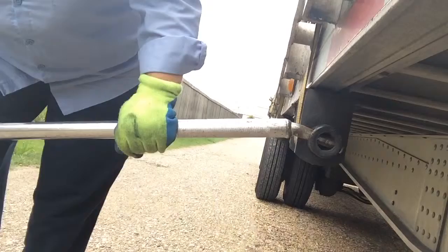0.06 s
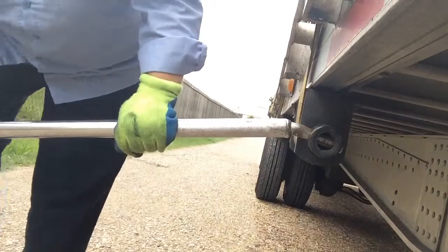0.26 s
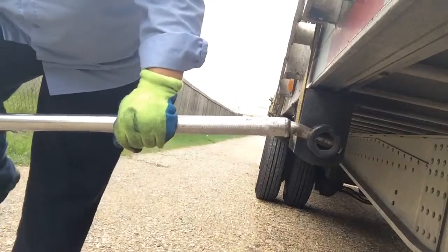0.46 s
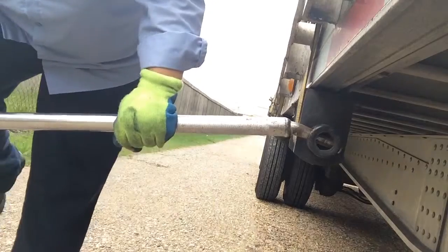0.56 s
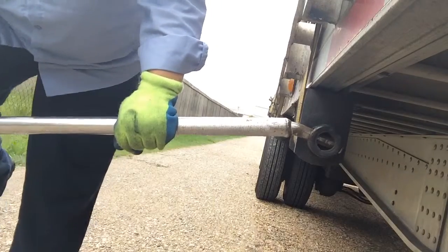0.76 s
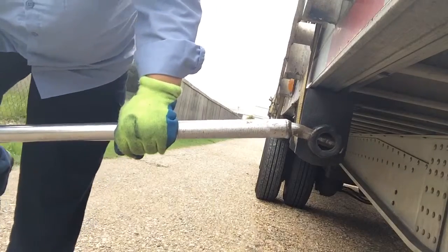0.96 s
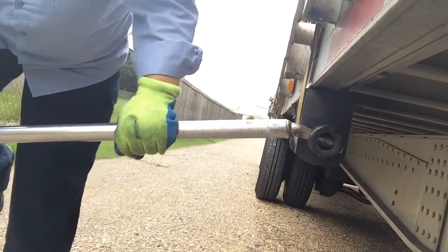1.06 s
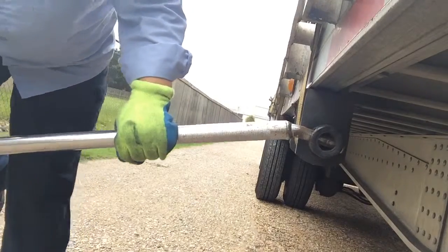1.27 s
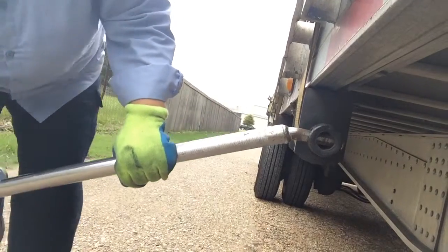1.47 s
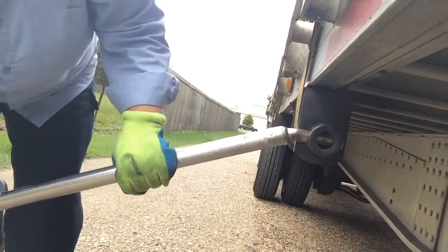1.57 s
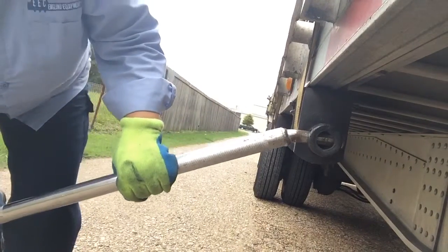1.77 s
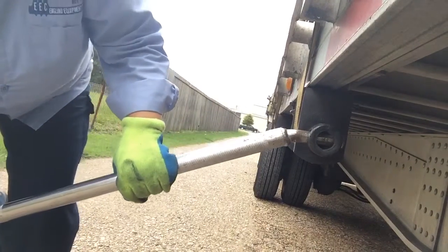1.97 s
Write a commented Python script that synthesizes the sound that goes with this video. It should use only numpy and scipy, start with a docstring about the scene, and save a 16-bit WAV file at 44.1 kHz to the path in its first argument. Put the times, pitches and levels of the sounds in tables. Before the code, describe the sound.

A steel bar works a trailer strap winch with a loud, ratcheting metallic clank over low rumble

```python
"""First comes an uneven low rumble, probably a diesel: lumpy coloured noise with soft low thumps and a drone.
Behind it the hiss of distant traffic, noise that drifts in brightness, swells and fades.
Then a steel bar swings a strap winch on a flatbed trailer: the pawl drops over a few ratchet teeth in one
quick clank. Each blow is a burst of chatter that leaves noise bands and decaying sines ringing in the frame.
The bar rattles in its socket, then starts to scrape: grainy coloured noise."""
import sys
import numpy as np
from scipy import signal
from scipy.fft import rfft, irfft
from scipy.io import wavfile
from scipy.ndimage import uniform_filter1d, minimum_filter1d

SR = 44100
rng = np.random.default_rng(int(sys.argv[2]) if len(sys.argv) > 2 else 0)


def to_wav(sig):
    """Store sig (one row per channel, or 1-D mono) as 16-bit WAV at the path in sys.argv[1].

    Samples outside -1..1 are clipped; the rate is SR.
    """
    pcm = np.clip(np.atleast_2d(sig), -1, 1) * 32767
    pcm = np.round(pcm).astype(np.int16)
    wavfile.write(sys.argv[1], SR, pcm.T)  # frames by channels


N = 88200  # samples, two seconds
TILT_HZ = 1000  # pivot of every treble tilt


def amp(db):
    """Turns decibels into a gain."""
    return 10 ** (np.asarray(db) / 20)


def unit(x):
    """Scales to rms 1."""
    return x / np.sqrt(np.mean(x ** 2) + 1e-20)


def read(points, hz):
    """Reads a table on a log-frequency axis."""
    f, value = np.transpose(points)
    return np.interp(np.log(hz + 1), np.log(f + 1), value)


def curve(points):
    """Reads a table along the time of the scene."""
    return np.interp(np.arange(N) / SR, *np.transpose(points))


def add(mix, start_s, sound):
    """Mixes a sound in at its start time, cut off at the end of the scene."""
    part = mix[round(start_s * SR):][:len(sound)]
    part += sound[:len(part)]


def colour(x, points):
    """Filters x by a spectrum table, then scales it to rms 1."""
    hz = np.fft.rfftfreq(len(x), 1 / SR)
    return unit(irfft(rfft(x) * amp(read(points, hz)), len(x)))


def octaves(hz):
    """Octaves above the pivot of a tilt; everything below 200 Hz counts as 200 Hz."""
    return np.log2(np.maximum(hz, 200) / TILT_HZ)


def bursts(size, per_s, fall_s, depth):
    """A gain that swells quickly at random contacts and falls back, at rms 1."""
    hits = 1. * (rng.random(size) < per_s / SR)
    t = np.arange(size) / (fall_s * SR)
    swell = 2 * t * np.exp(1 - 2 * t)
    return unit(1 + depth * signal.fftconvolve(hits, swell)[:size])


def ripple(x, gap_hz, depth_db):
    """Random peaks and dips, at full depth above 1500 Hz, as a gain for each bin of x."""
    hz = np.fft.rfftfreq(len(x), 1 / SR)
    heights = np.clip(rng.standard_normal(4096), -2, 2)
    peaks = np.interp(hz / gap_hz, np.arange(4096), heights)
    return amp(depth_db * np.clip(hz / 1500, 0, 1) * peaks)


# Colour of the traffic hiss [pitch_hz, relative level_db per Hz]
TRAFFIC_COLOUR = [(290, -26), (500, -4.5), (578, -7), (629, -5), (938, -0.5), (1280, -6), (1600, -5.5),
                  (1940, -11.5), (2960, -15.5), (3220, -13.5), (3910, -19.5), (7690, -27), (9000, -35.5),
                  (11700, -63), (19800, -120)]
# Colour of the faint fizz that follows the traffic [pitch_hz, relative level_db per Hz]
FIZZ_COLOUR = [(6000, -22), (9000, -6), (10200, 5), (11300, -10), (12500, -14), (13200, 6), (13800, -15),
               (15000, -22)]
# Drift in brightness [time_s, tilt_db per octave]
TRAFFIC_TILT = [(0, -0.5), (.25, -1.5), (.65, -0.5), (1.3, 0), (2, -2.5)]
# Swell and fade [time_s, gain_db]
TRAFFIC_LEVEL = [(0, -49.5), (.08, -54), (.22, -45.5), (.6, -43.5), (.95, -45), (1.3, -47), (1.8, -54.5),
                 (2, -49)]
FIZZ_DB = -23.5  # against the main hiss


def traffic():
    """Distant tyre hiss is broadband noise whose treble tilt and level drift with time."""
    hiss = colour(rng.standard_normal(N), TRAFFIC_COLOUR)
    fizz = amp(FIZZ_DB) * colour(rng.standard_normal(N), FIZZ_COLOUR)
    hz, t, bands = signal.stft(hiss + fizz, SR, nperseg=512)
    bands = bands * amp(octaves(hz)[:, None] * np.interp(t, *np.transpose(TRAFFIC_TILT)))
    return signal.istft(bands, SR)[1][:N] * amp(curve(TRAFFIC_LEVEL))


# Colour of the rumble [pitch_hz, relative level_db per Hz]
RUMBLE_COLOUR = [(12, -52), (20, -31), (43, -16.5), (59, -9), (81, -2.5), (124, -5), (216, -18), (247, -13),
                 (274, -32.5), (300, -30), (390, -33), (660, -120)]
# Its level [time_s, level_db]
RUMBLE_LEVEL = [(0, -27.5), (.08, -39.5), (.14, -32), (.3, -32), (.5, -33), (.7, -33.5), (.92, -37),
                (1.05, -35.5), (1.22, -38.5), (1.33, -34), (1.6, -35.5), (1.82, -39.5), (2, -35)]
# Colour of the low drone above the rumble [pitch_hz, relative level_db per Hz]
DRONE_COLOUR = [(120, -23), (190, -1.5), (250, -3.5), (320, 0.5), (450, -9.5), (900, -26), (3000, -49.5)]
# Its level [time_s, level_db]
DRONE_LEVEL = [(0, -35), (.05, -33.5), (.075, -45), (.15, -38), (.35, -43.5), (.8, -44.5), (1.25, -48),
               (1.8, -42.5), (2, -40)]
# Heaviest thumps in the rumble [centre_s, peak level_db]
THUMPS = [(0.247, -29), (.354, -21.5), (0.377, -30.5), (0.454, -23), (.514, -19), (0.573, -28),
          (0.697, -24), (0.77, -26), (0.791, -28.5), (0.855, -25.5), (1.081, -27), (1.267, -25)]
LUMPS_PER_S, LUMP_S, LUMP_DEPTH = 35, 0.0027, 0.88  # rate, fall time and depth of the unevenness
THUMP_HZ, THUMP_WIDTH_S = 82.5, 0.0079  # middle pitch, half-width of the bell envelope


def diesel():
    """An uneven rumble of lumpy noise, a drone of steady-grained noise and heavier thumps of low sine."""
    lumps = rng.standard_normal(N) * bursts(N, LUMPS_PER_S, LUMP_S, LUMP_DEPTH)
    rumble = colour(lumps, RUMBLE_COLOUR) * amp(curve(RUMBLE_LEVEL))
    drone = colour(rng.standard_normal(N), DRONE_COLOUR) * amp(curve(DRONE_LEVEL))
    out = rumble + drone
    t = np.arange(N) / SR
    for (centre_s, db), (turn, pitch) in zip(THUMPS, rng.random((len(THUMPS), 2))):
        age = t - centre_s
        hz = THUMP_HZ * 2 ** ((pitch - .5) / 2)  # up to a quarter octave either way
        bell = np.exp(-(age / THUMP_WIDTH_S) ** 2)
        out += amp(db) * bell * np.sin(2 * np.pi * (hz * age + turn))
    return out


# Level of the bar's scrape in its socket, silent before the first row [time_s, level_db]
SCRAPE_LEVEL = [(1.968, -81), (1.977, -47.5), (2.0, -38)]
# Its colour [pitch_hz, relative level_db per Hz]
SCRAPE_COLOUR = [(300, 7), (1500, -7), (3500, -8), (5500, -6), (7600, 1), (10000, -8), (15000, -9)]


def scrape():
    """Steel slides on steel in fine grains: noise broken up by random contacts."""
    grains = rng.standard_normal(N) * bursts(N, per_s=750, fall_s=0.00065, depth=0.52)
    started = np.arange(N) / SR > SCRAPE_LEVEL[0][0]
    return colour(grains, SCRAPE_COLOUR) * amp(curve(SCRAPE_LEVEL)) * started


MODE_SPREAD_DB = 2.5  # random spread of each mode from blow to blow


def ring(modes, t):
    """Decaying sines, excited a little differently by each blow."""
    hz, db, t60 = np.transpose(modes)[:, :, None]
    db = db + MODE_SPREAD_DB * rng.standard_normal(hz.shape)
    decay = np.exp(-np.log(1000) * t / t60)
    sines = np.sin(2 * np.pi * (hz * t + rng.random(hz.shape)))
    return (amp(db) * decay * sines).sum(0)


def dying(x, t60s, age, tilt_db):
    """Tilts x, then lets each of nine overlapping bands die at its own speed."""
    hz = np.fft.rfftfreq(len(x), 1 / SR)
    centres = np.geomspace(150, 14000, 9)
    spectrum = rfft(x) * amp(tilt_db * octaves(hz))
    out = 0
    for centre, pick in zip(centres, np.eye(len(centres))):
        weight = read(list(zip(centres, pick)), hz)  # a triangle, 1 at its own centre
        decay = np.exp(-np.log(1000) * age / read(t60s, centre))
        out = out + irfft(spectrum * weight, len(x)) * decay
    return out


# Blows of pawl and bar
# [start_s, relative level_db, treble tilt_db per octave, chatter_s, relative pawl_ring_db]
BLOWS = [(1.3622, -13.5, -0.5, 0.018, -57), (1.3914, -25, 1, 0.015, -78), (1.4289, -11.5, -0.6, 0.017, -72),
         (1.4919, -14, 0.64, 0.015, -45), (1.5440, -19.5, -1.2, 0.028, -76.5),
         (1.573, -27.5, 5.5, 0.0056, -45), (1.5974, -17, -0.9, 0.011, -68), (1.614, -38, 6.5, 0.0045, -75),
         (1.6295, -42, 7.5, 0.008, -70), (1.658, -45, 3.5, 0.011, -80), (1.7975, -64, 12, 0.0087, -70),
         (1.82, -66, 7, 0.0071, -93)]
# Colour of the frame's dense ring, before ripple and tilt [pitch_hz, relative level_db per Hz]
CLANG_COLOUR = [(70, -53), (130, -17.5), (188, -13.5), (260, -12.5), (310, -1), (450, -11.5), (640, -9),
                (770, -20), (1100, -13), (1520, -12.5), (1720, -18), (2550, -19), (3300, -25.5),
                (4500, -31), (6000, -38), (9000, -46.5), (11200, -56), (12200, -60), (13400, -62),
                (15500, -66)]
# Decay of that ring once the chatter ends [pitch_hz, t60_s]
CLANG_T60 = [(150, 0.86), (350, 0.11), (800, 0.4), (1600, 0.24), (3500, 0.18), (7000, 0.093), (14000, 0.15)]
# Decay of the long afterring [pitch_hz, t60_s]
AFTER_T60 = [(200, 1.37), (550, 0.85), (1200, 0.31), (3000, 0.32), (12000, 0.12)]
# Strong modes of winch and frame [pitch_hz, relative level_db, t60_s]
FRAME_MODES = [(182.7, -19, 1.63), (197.9, -11, 0.58), (298.8, -2.5, 0.43), (322.4, -7, 0.46),
               (340.7, 0.5, 0.36), (418.4, -13, 0.3), (518, -2.5, 0.14), (517.6, -10.5, 0.59),
               (630, -9, 0.49), (908, -12.5, 0.2), (1228, -18.5, 0.18), (1524, -6.5, 0.11),
               (1598, -6, 0.093), (1918, -14, 0.37), (1956, -12.5, 0.24), (2376, -14.5, 0.22),
               (2482, -17, 0.13), (2785, -10, 0.096), (2930, -18.5, 0.29), (4470, -30, 0.27)]
# Thin ring of the pawl [pitch_hz, relative level_db, t60_s]
PAWL_MODES = [(8480, -1, 0.11), (11900, -10, 0.15), (14210, -8, .3), (14810, -12, 0.2)]
CHATTER_PER_S, CHATTER_S, CHATTER_DEPTH = 220, 0.00094, 0.24  # rate, fall time, depth
ATTACK_S, MODE_RISE_S = 0.001, 0.0016
DROP_S, DROP_SHARE = 0.002, 0.22  # share of the clang lost fast when the chatter ends
AFTER_DB, MODES_DB = -14, -3  # offsets of afterring and modes
PARTIAL_GAP_HZ, PARTIAL_DEPTH_DB = 37.74, 2.5  # the frame's countless small resonances
SPOT_GAP_HZ, SPOT_DEPTH_DB = 170.3, 2  # each blow lands on its own spot and favours other bands
SETTLE_S, SETTLE_FALL_S, SETTLE_DB = 1.65, 0.081, -2.5  # the ring is damped as the bar comes to rest
LOW_CUT_HZ = 174  # the frame radiates little below this


def winch():
    """Each blow chatters briefly, then leaves the steel frame and the pawl ringing."""
    out, t = np.zeros(N), np.arange(SR) / SR
    frame = ripple(t, PARTIAL_GAP_HZ, PARTIAL_DEPTH_DB)
    for start_s, db, tilt_db, chatter_s, pawl_db in BLOWS:
        age = np.maximum(t - chatter_s, 0)  # time since the chatter ended
        body = frame * ripple(t, SPOT_GAP_HZ, SPOT_DEPTH_DB)
        early, late = (colour(irfft(body * rfft(noise), SR), CLANG_COLOUR)
                       for noise in rng.standard_normal((2, SR)))
        drop = 1 - DROP_SHARE + DROP_SHARE * np.exp(-age / DROP_S)
        contact = drop * bursts(SR, CHATTER_PER_S, CHATTER_S, CHATTER_DEPTH)
        clang = dying(early, CLANG_T60, age, tilt_db) * contact
        after = amp(AFTER_DB) * dying(late, AFTER_T60, t, tilt_db)
        modes = amp(MODES_DB) * ring(FRAME_MODES, t) * (1 - np.exp(-t / MODE_RISE_S))
        pawl = amp(pawl_db) * ring(PAWL_MODES, t)
        attack = 1 - np.exp(-(t / ATTACK_S) ** 2)
        add(out, start_s, (amp(db) * (clang + after + modes) + pawl) * attack)
    out *= amp(curve([(SETTLE_S, 0), (SETTLE_S + SETTLE_FALL_S, SETTLE_DB)]))
    return signal.sosfilt(signal.butter(2, LOW_CUT_HZ, "high", fs=SR, output="sos"), out)


def scene():
    """The winch close by, the yard behind it, in one channel."""
    return (traffic() + diesel() + scrape() + winch())[None]


# Colour of the steady microphone hiss [pitch_hz, relative level_db per Hz]
HISS_COLOUR = [(2000, -30), (7000, -2), (9300, -11), (10200, 10), (11100, -29), (13000, -29), (15000, -18)]
HISS_DB = -75.5
LIMIT_DB, LIMIT_HOLD_S = -2.5, .004  # ceiling, window of the gain dip
EDGE_HZ = 15450  # upper band limit


def record(dry):
    """Adds microphone hiss, then a quick limiter, then the band limit."""
    wet = dry + amp(HISS_DB) * colour(rng.standard_normal(N), HISS_COLOUR)
    size = int(LIMIT_HOLD_S * SR) + 1
    needed = np.minimum(1, amp(LIMIT_DB) / (abs(wet) + 1e-9))
    gain = uniform_filter1d(minimum_filter1d(needed, size), size)  # hold each dip, then smooth it
    low_pass = signal.firwin(511, EDGE_HZ, window=("kaiser", 9), fs=SR)
    return signal.oaconvolve(wet * gain, low_pass[None], "same")


dry = scene()
out = record(dry)
to_wav(out)
```